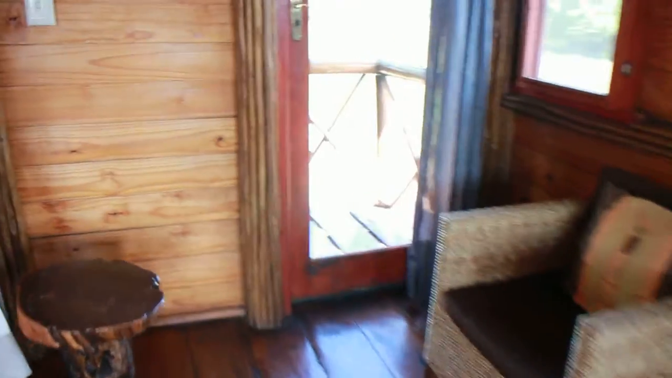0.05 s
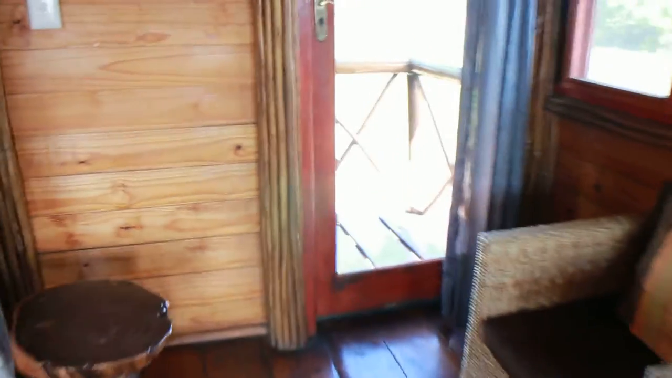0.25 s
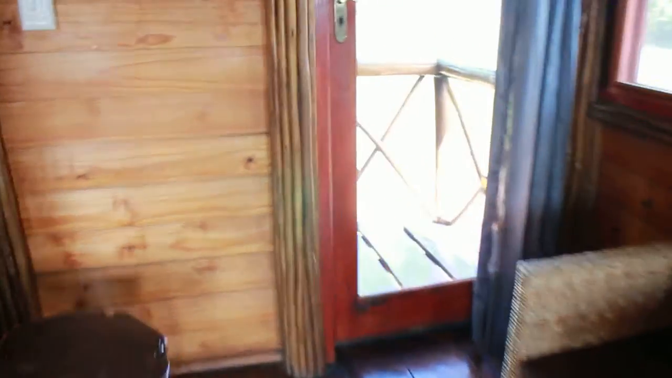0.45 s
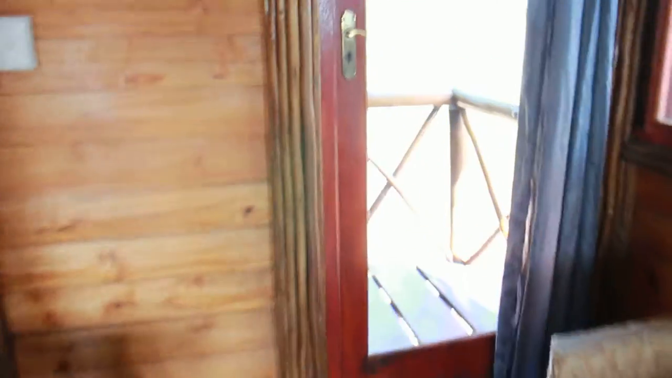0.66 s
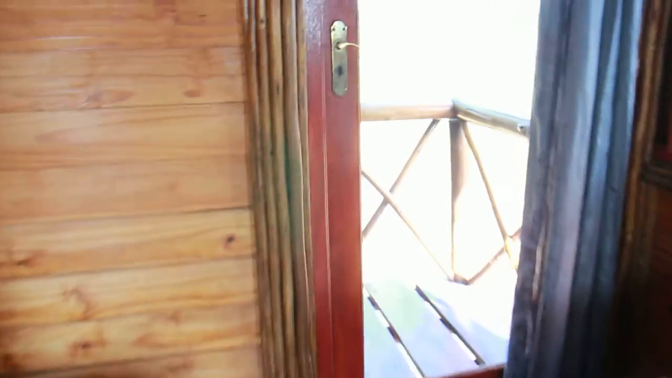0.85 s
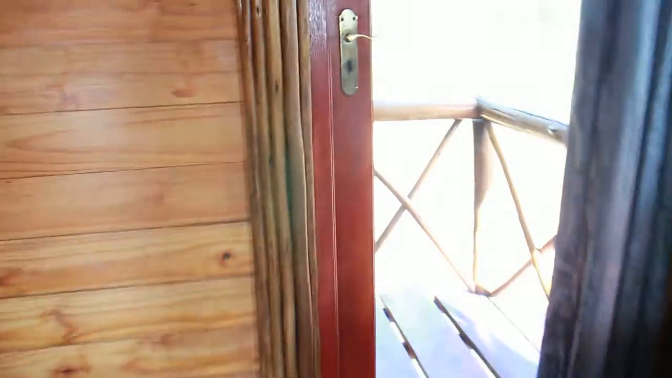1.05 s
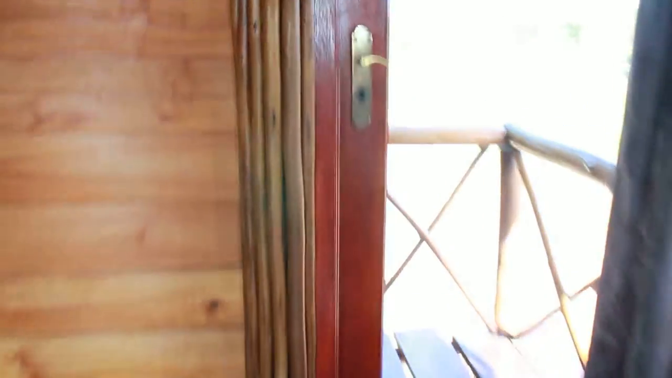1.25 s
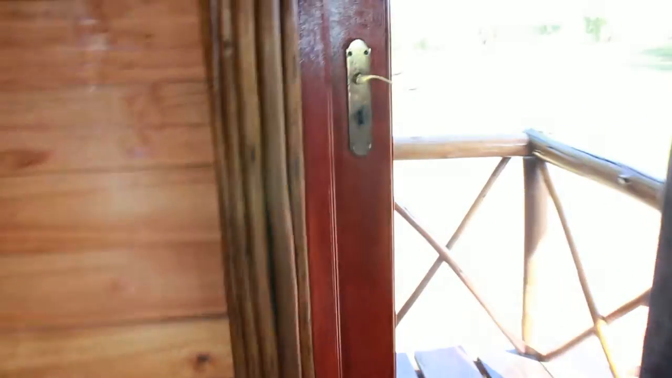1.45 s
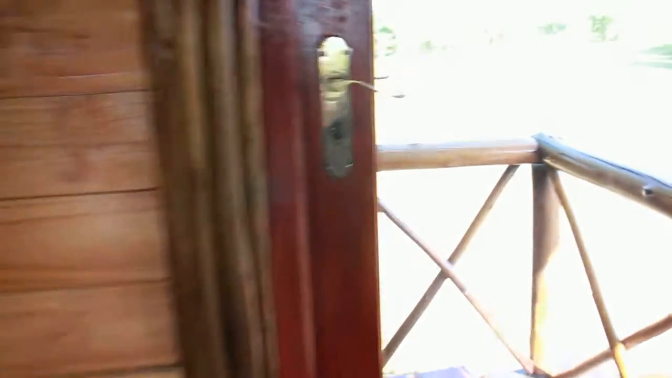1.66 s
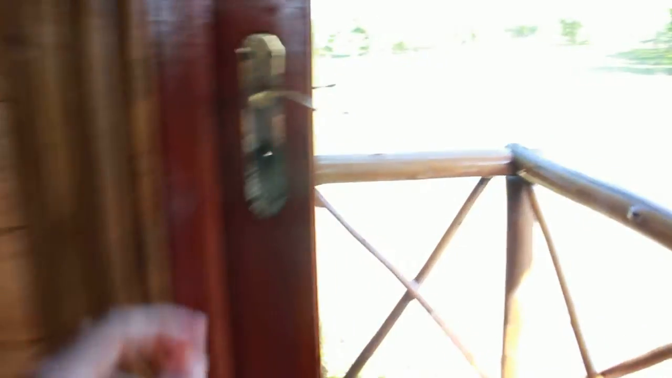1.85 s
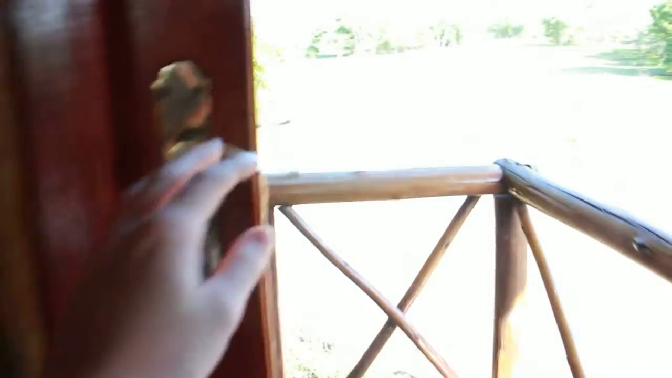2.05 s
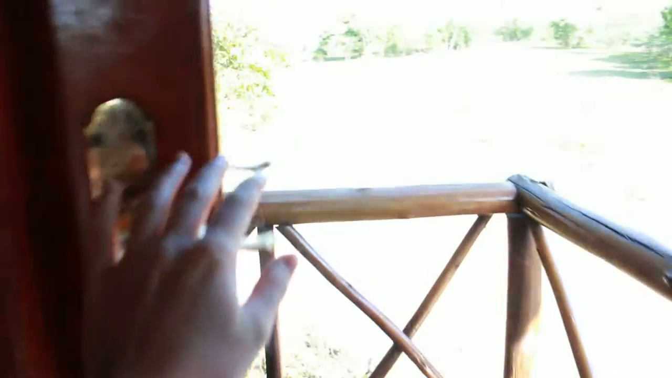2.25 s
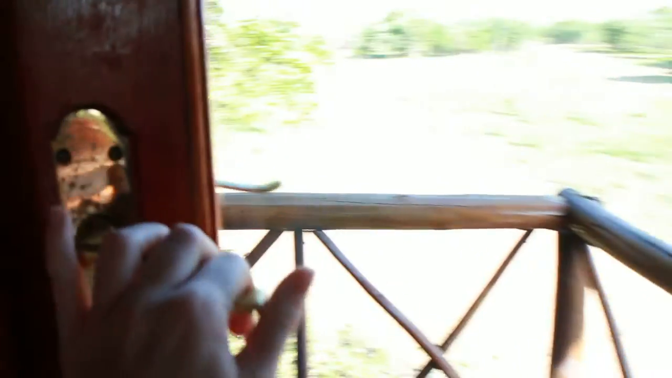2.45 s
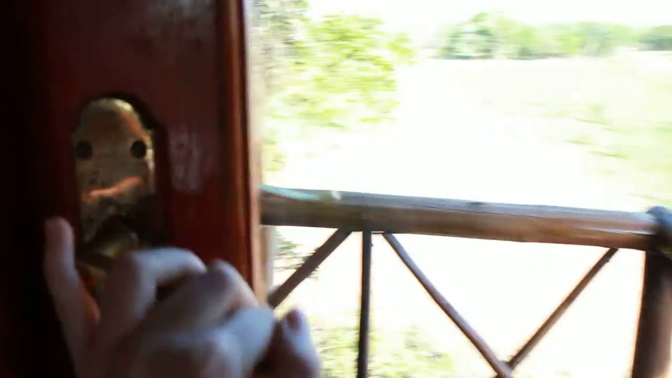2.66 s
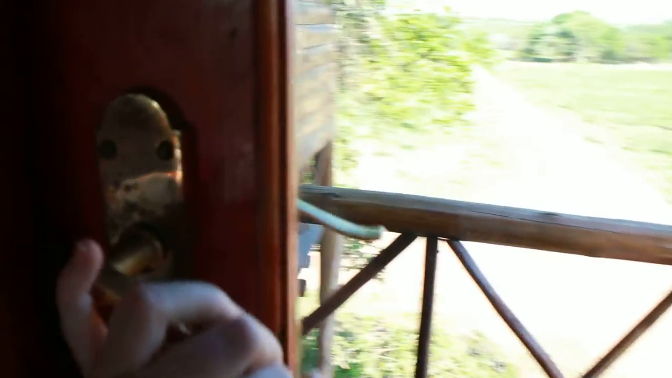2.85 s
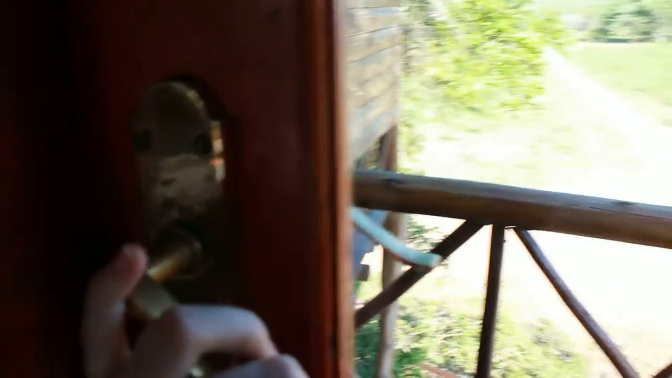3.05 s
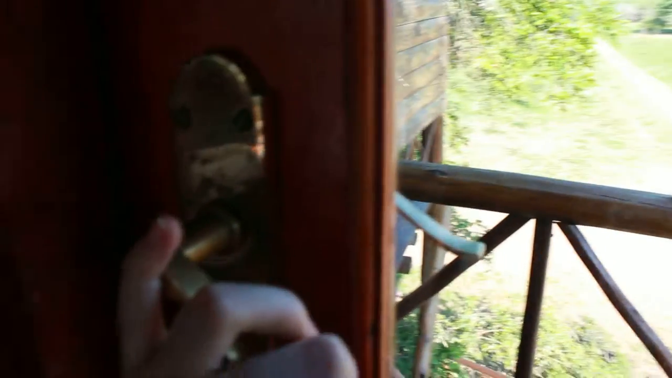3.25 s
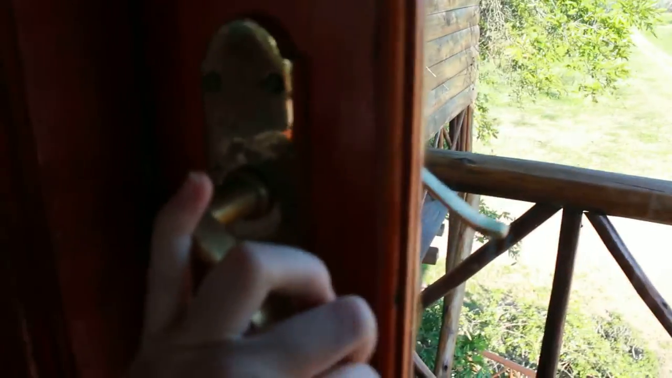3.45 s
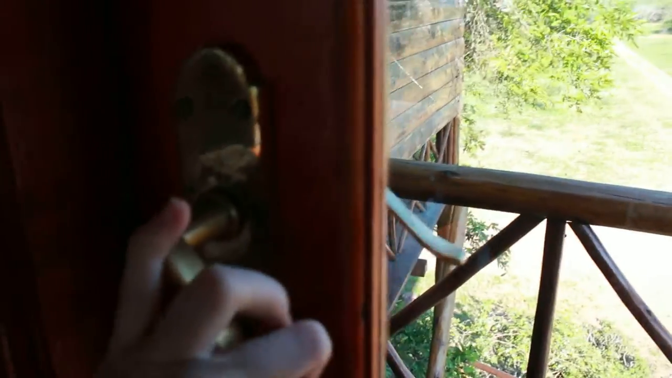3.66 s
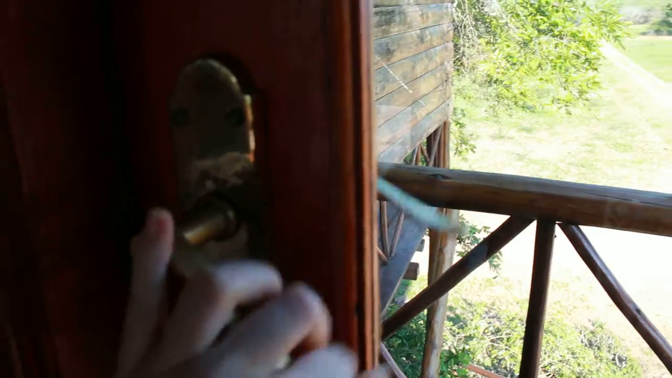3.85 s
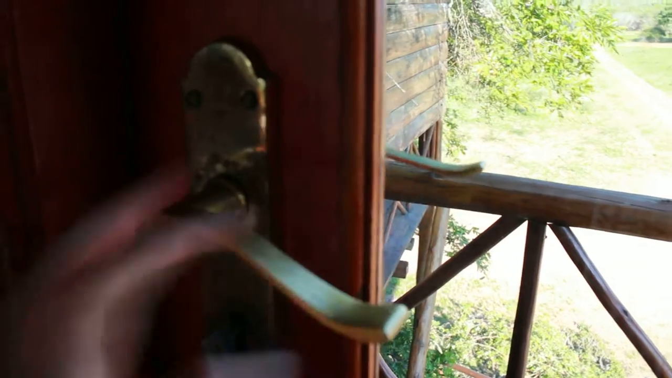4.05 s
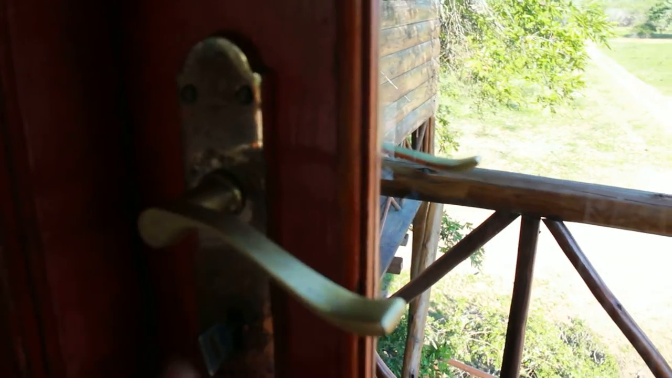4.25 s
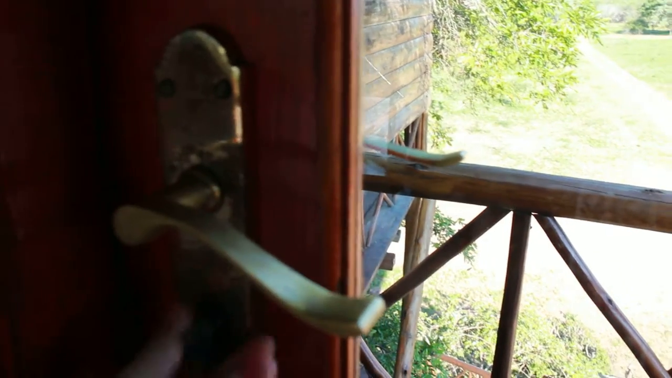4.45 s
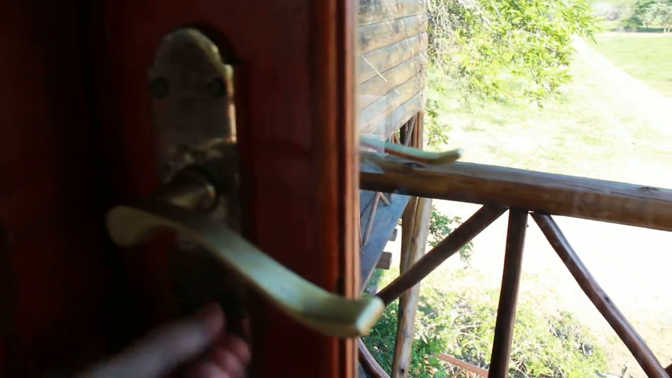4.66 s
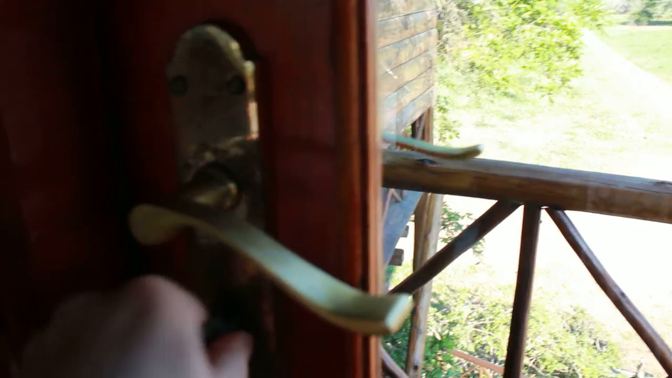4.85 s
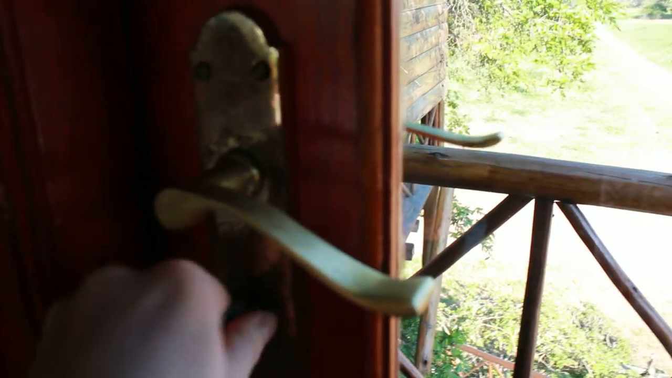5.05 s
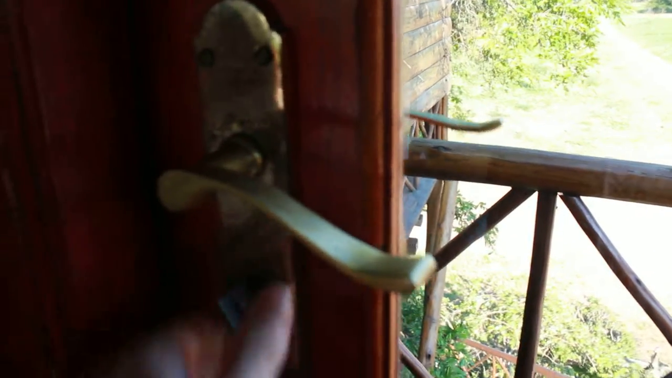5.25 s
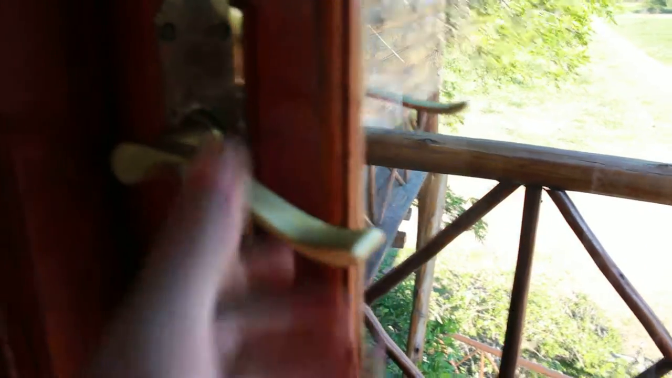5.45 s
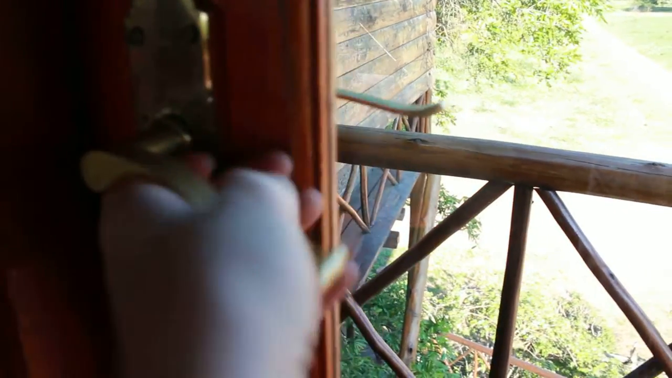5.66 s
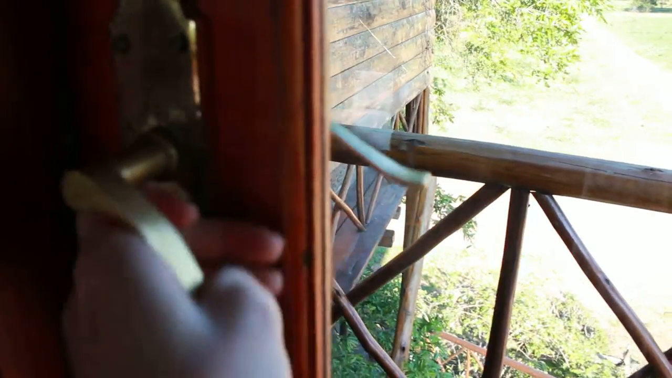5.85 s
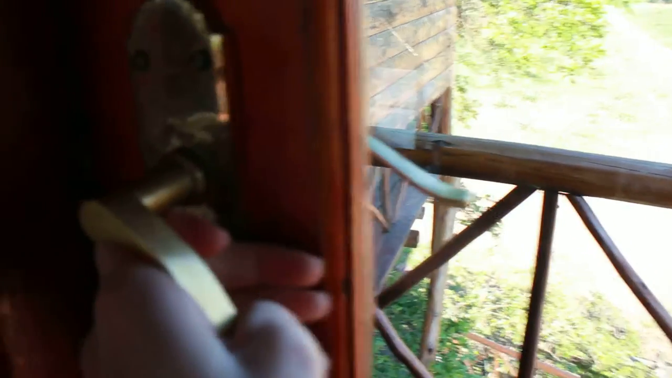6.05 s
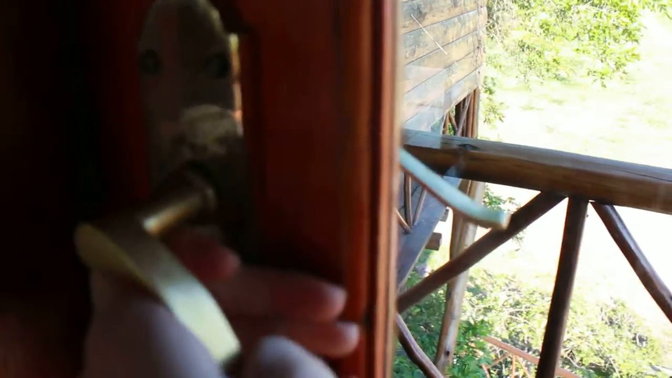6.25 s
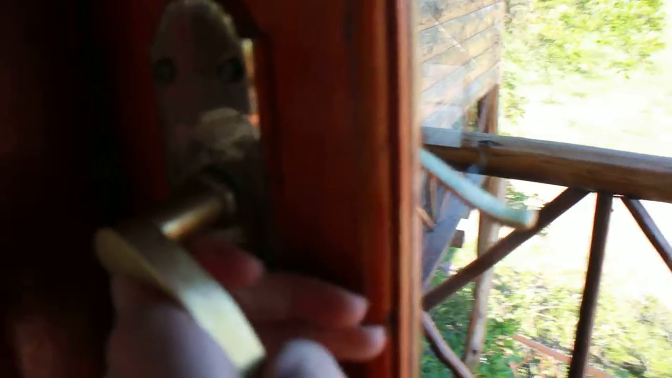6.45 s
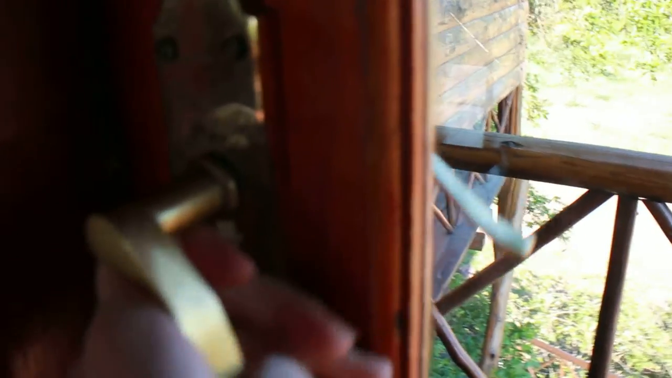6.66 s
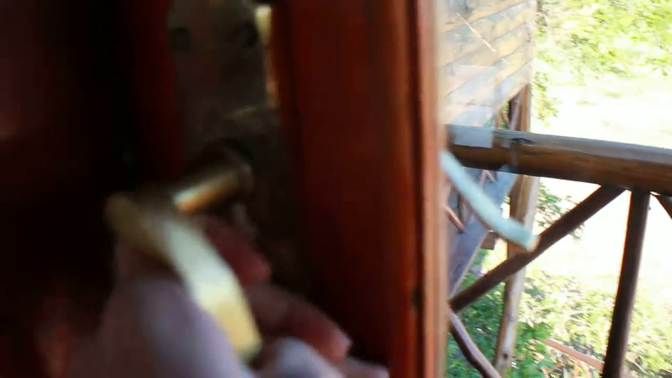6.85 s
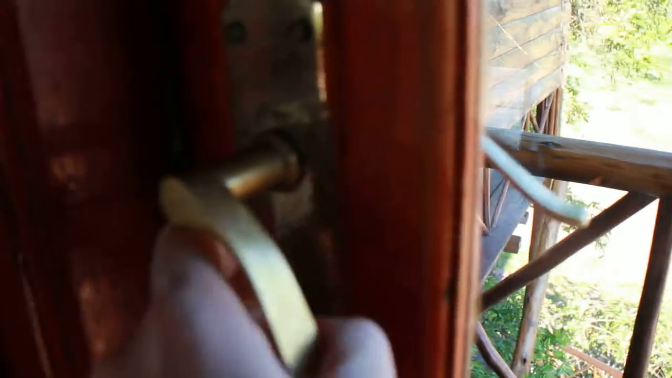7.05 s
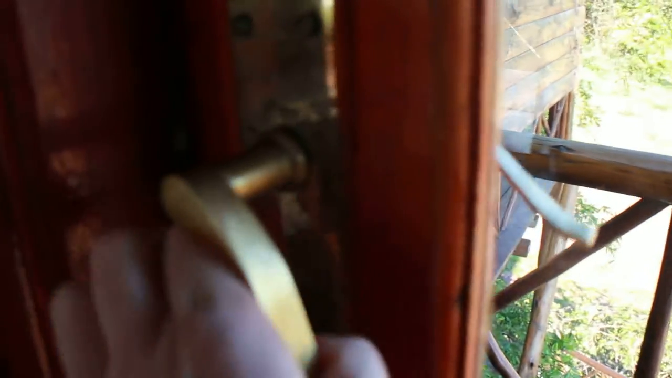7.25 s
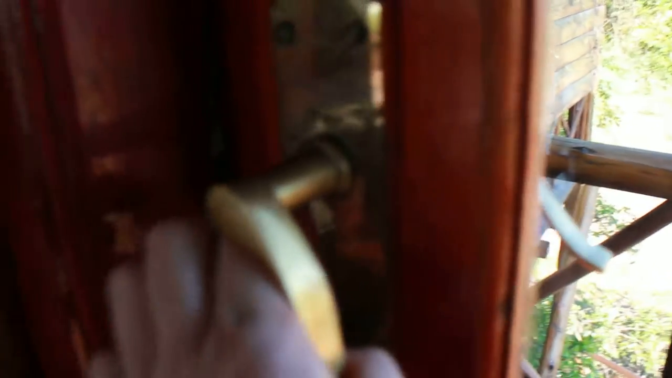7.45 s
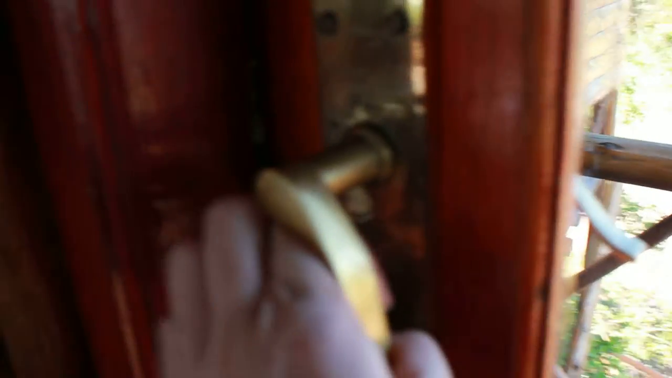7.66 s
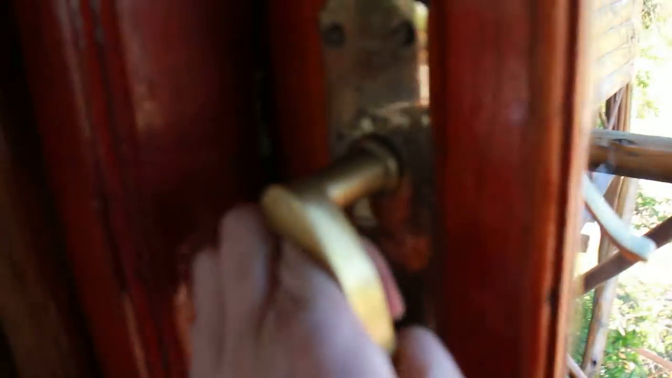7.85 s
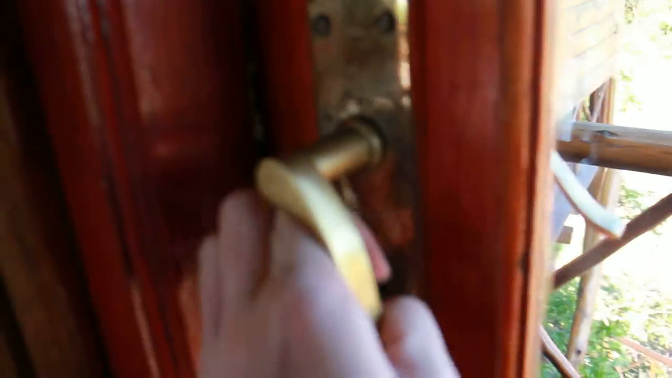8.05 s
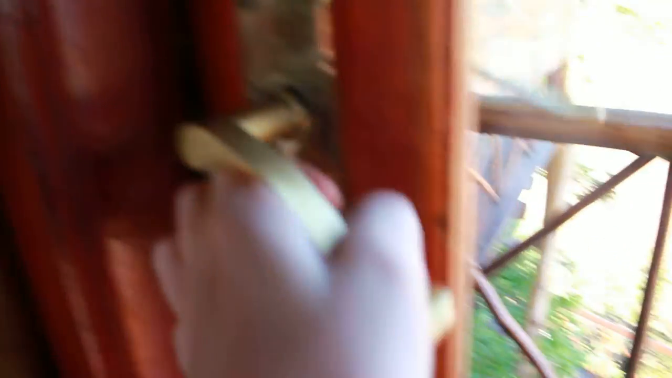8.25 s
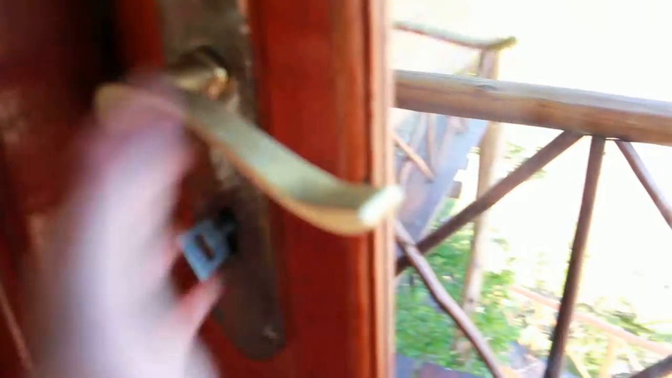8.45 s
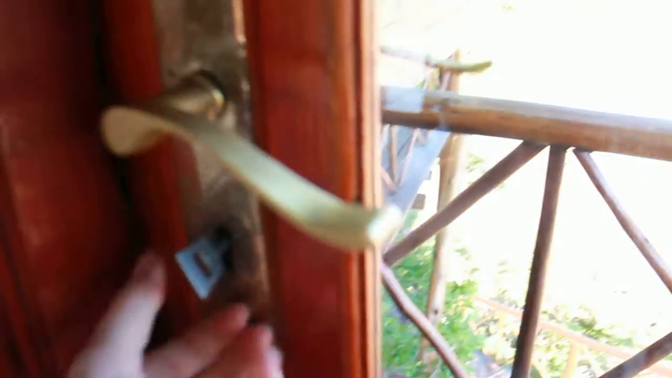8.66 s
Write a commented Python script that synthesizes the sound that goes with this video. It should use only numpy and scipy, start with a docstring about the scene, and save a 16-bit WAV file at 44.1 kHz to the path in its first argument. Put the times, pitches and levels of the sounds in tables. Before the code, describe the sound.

After soft footsteps on boards, a brass door lever and key clack, rattle and squeak inside a small quiet wooden room.

```python
"""Over quiet outdoor air and handling rumble, steps and scuffs sound on boards, then dry ticks near the microphone.
From 2.3 s a door's brass lever is worked: lever, latch and key are noise bursts ringing lock case and door modes.
Sliding parts scrape as modulated noise and rattle as random strikes; dull blows on wood continue between them.
From 3.5 s the dry spindle squeaks at times, as stick-slip tones with harmonics; a key turns between 4.4 and 5 s.
The small timber room adds a short, dull diffuse echo, and the recorder cuts the top."""
import sys
import numpy as np
from scipy import signal
from scipy.fft import rfft, irfft
from scipy.io import wavfile
from scipy.ndimage import map_coordinates

SR = 44100
rng = np.random.default_rng(int(sys.argv[2]) if len(sys.argv) > 2 else 0)


def int16_out(signal):
    """Quantize to a 16-bit WAV file."""
    q = np.round(np.clip(np.atleast_2d(signal).T, -1, 1) * 32767)
    wavfile.write(sys.argv[1], SR, q.astype(np.int16))


N = 384728
TOP_HZ = 16100  # upper limit of the recorder

# Radiating parts: door leaf, lock case, brass parts, contact edge. Columns: low f/Hz, high f/Hz
PART_BANDS = [(90, 726), (600, 2480), (2400, 5460), (6500, 9670)]
# Metal sliding in the lock. Columns: start t/s, nominal length t/s, nominal level/dB, brightness/dB per band
SLIDES = [(2.313, 0.016, -52, 0), (2.656, 0.096, -48.5, -7.5), (3.005, 0.052, -44, -0.5),
          (3.131, 0.03, -49.5, -1.5), (3.814, .06, -43.5, 4), (3.927, 0.014, -33.5, -1),
          (4.514, .2, -42, 1), (4.721, 0.088, -47, -9.5), (5.586, .12, -45, 3), (5.701, 0.059, -35, -3),
          (5.865, .008, -46, 1.5), (6.14, 0.013, -40.5, -3), (6.575, 0.063, -40.5, 7.5),
          (6.661, 0.08, -48, -1.5), (6.915, .055, -45, -0.5), (6.986, 0.04, -37.5, -0.5),
          (7.26, 0.075, -43, 4), (8.189, 0.062, -31.5, 4), (8.36, 0.0345, -42.5, -2.5)]
# Nominal activity of the hand holding the microphone. Columns: t/s, level/dB
HAND_MOTION = [(0, -60), (.9, -62), (1.9, -54.5), (3.5, -46.5), (4.3, -82), (6.4, -50), (8.7, -60)]


def undb(db):
    """Amplitude ratio from a level difference in decibels."""
    return 10 ** (np.asarray(db) / 20)


def unit(x):
    """Normalisation by mean power: scale to rms 1."""
    return x / np.sqrt(np.mean(x ** 2) + 1e-20)


def band(x, lo_hz, hi_hz, order=3):
    """Causal band-pass with a maximally flat passband."""
    edges_hz = [lo_hz, min(hi_hz, SR / 2 - 100)]
    return signal.sosfilt(signal.butter(order, edges_hz, "bandpass", fs=SR, output="sos"), x)


def wander(count, hz):
    """Band-limited random motion: a cubic spline through Gaussian knots of spread 1, hz knots a second."""
    knots = np.arange(count) / SR * hz
    return map_coordinates(rng.standard_normal(int(knots[-1]) + 4), [knots + 1], order=3)


def stereo_noise(count, side_db):
    """Mid-side superposition: the level of the antiphase part sets how far the two channels differ."""
    mid, side = rng.standard_normal((2, count))
    return mid + undb(side_db) * side * np.array([[1], [-1]])


def fade(t, t60):
    """Exponential decay: the amplitude falls by 60 dB in t60 seconds."""
    return np.exp(-np.log(1000) * t / t60)


def add(out, start, sound):
    """Linear superposition of a sound at its start time in seconds."""
    i = max(int(start * SR), 0)
    out[:, i:i + sound.shape[-1]] += sound[..., :N - i]


def resonance(x, hz, width_hz):
    """Forced response of one damped mode, with gain 1 at its centre."""
    return signal.lfilter(*signal.iirpeak(hz, hz / width_hz, fs=SR), x)


def body(x):
    """Modal superposition: whatever shakes the lock also rings the door's own modes."""
    # Door with its lock case. Columns: f/Hz, width f/Hz, level/dB relative to the broad response
    door_modes = [(245.8, 3.3, -5), (698, 15, -59.5), (847, 250, -7.5), (1252, 180, -6.5), (1483, 80, -3.5),
                  (2270, 12, -5), (4022, 40, 2), (4940, 70, 1.5), (5573, 76, -15)]
    return x + sum(undb(db) * resonance(x, hz, width_hz) for hz, width_hz, db in door_modes)


def blow(t60, crack_db, chatter_db, length_s=.3):
    """Impulsive excitation: a crack, then a dense decaying ring broken by tiny rebounds."""
    t = np.arange(int(length_s * SR)) / SR
    onset = 1 - np.exp(-t / 0.00041)
    envelope = (fade(t, t60) + undb(crack_db) * fade(t, 0.00087)) * onset
    shake = stereo_noise(len(t), side_db=-17)
    chatter = undb(chatter_db * wander(len(t), 420))
    return body(shake * envelope * chatter)


def strength(x, db):
    """Onset level: scale a blow by the spread of its first 14 ms."""
    return x * undb(db) / np.std(x[:, :int(.014 * SR)])


def background():
    """Stationary coloured noise, wide in the treble, plus low-frequency rumble of the moving hand."""
    # Relative spectral density of outdoor air and hiss. Columns: f/Hz, level/dB per Hz
    air_spectrum = [(15, -36.5), (25, 6.5), (108, 0.5), (344, -2), (1440, -12), (2050, -15.5), (4140, -15),
                    (6560, -26), (9570, -17.5), (11300, -26.5), (14800, -23), (16000, -33)]
    air_db = -53
    f = np.maximum(np.fft.rfftfreq(N, 1 / SR), 1)
    hz, db = np.transpose(air_spectrum)
    colour = undb(np.interp(np.log(f), np.log(hz), db))
    width = undb(np.interp(np.log(f), np.log([200, 2000, 12000]), [-11, -6, 1]))
    mid, side = rfft(rng.standard_normal((2, N)))
    air = unit(irfft(colour * (mid + width * side * np.array([[1], [-1]])), N))

    rumble = band(stereo_noise(N, side_db=-13), 28, 150, order=1)
    rumble = unit(band(rumble, 18, 400, order=2))
    time = np.arange(N) / SR
    motion_db = np.interp(time, *np.transpose(HAND_MOTION)) - 1.5 + 1.27 * wander(N, 9.9)
    return undb(air_db) * air + undb(motion_db) * rumble


def room(x):
    """Diffuse reverberation: convolution with decaying noise; absorption leaves the bass longest."""
    # Decay of the room by band. Columns: low f/Hz, high f/Hz, t60 t/s, level/dB
    decay_bands = [(65.3, 376, 0.76, -15), (415, 1310, 0.27, -12), (1720, 2900, 0.19, -14),
                   (5030, 42000, 0.22, -16)]
    t = np.arange(int(.6 * SR)) / SR
    build_up = 1 - np.exp(-(t / 0.014) ** 2)
    response = 0
    for lo, hi, t60, db in decay_bands:
        tail = stereo_noise(len(t), side_db=-2) * build_up * fade(t, t60)
        tail = unit(tail) / np.sqrt(len(t))
        response = response + undb(db) * band(tail, lo, hi)
    return signal.fftconvolve(x, response, axes=1)[:, :N]


def fidget():
    """Random impacts: faint bumps and taps, stronger while the hand is busy."""
    out = np.zeros((2, N))
    for moment, size, pitch in rng.random((55, 3)):
        start = moment * N / SR
        db = np.interp(start, *np.transpose(HAND_MOTION)) + 1 + 8 * size
        centre_hz = 170 * 7 ** pitch
        tap = blow(.1, crack_db=5, chatter_db=3.5, length_s=.15)
        tap = band(tap, centre_hz / 2, centre_hz * 2, order=2)
        add(out, start, strength(tap, db - 4 * pitch))
    return out


def scuffs():
    """Friction noise: a sole brushes the boards in a smooth swell with one hollow resonance."""
    # Shoes on the boards. Columns: start t/s, length t/s, level/dB before the swell
    sole_strokes = [(0.462, 0.17, -41.5), (0.95, 0.11, -50.5), (1.76, .45, -54.5)]
    hollow_hz, hollow_db = 800, 7
    out = np.zeros((2, N))
    for start, length, db in sole_strokes:
        count = int(length * SR)
        friction = band(stereo_noise(count, side_db=-4.5), 550, 1400, order=1)
        friction = band(friction, 150, 8800, order=2)
        friction = friction + undb(hollow_db) * resonance(friction, hollow_hz, width_hz=30)
        swell = np.sin(np.linspace(0, np.pi, count))
        add(out, start, undb(db) * unit(friction) * swell)
    return out


def wood():
    """Struck plates: a short knock, the decaying boom of a floor board or door leaf, and floor rumble."""
    # Blows of feet and hand. Columns: t/s, nominal boom level/dB, hardness (knock over boom) level/dB, boom f/Hz
    board_blows = [(0.405, -44.5, -9, 107), (1.115, -33, 2, 194), (1.156, -37.5, 1, 168),
                   (1.539, -36, 11.5, 110.5), (1.716, -36.5, -19, 99), (2.405, -43, 11, 270),
                   (2.445, -35.5, 1, 88), (2.7, -34.5, 1, 265), (3.193, -36.5, -13.5, 284),
                   (3.458, -36.5, 11.5, 86.4), (4.277, -32.5, 7.5, 355), (5.079, -35.5, -7, 298),
                   (5.735, -29.5, 0, 349), (5.261, -41, -8.5, 324), (6.383, -26.5, 7.5, 399),
                   (7.785, -36, 9.5, 300)]
    t60_at_200_hz, t60_exponent = 0.18, -0.51  # seconds; lower boards ring longer
    floor_t60_s, floor_db = 0.63, -15  # the timber floor rumbles on after a blow
    out = np.zeros((2, N))
    t = np.arange(int(.5 * SR)) / SR
    for start, boom_db, hardness_db, boom_hz in board_blows:
        t60 = t60_at_200_hz * (boom_hz / 200) ** t60_exponent
        board = band(blow(t60, crack_db=0, chatter_db=3.5), 108, 404, order=2)
        boom = np.sqrt(2) * np.sin(2 * np.pi * boom_hz * t)
        boom = boom * fade(t, t60 * 0.85) * (1 - np.exp(-t / 0.00104))
        knock = band(blow(t60 * 0.55, crack_db=-7, chatter_db=3.5), 400, 1800, order=2)
        rumble = unit(band(stereo_noise(len(t), side_db=5), 130, 340, order=2))
        rumble = rumble * fade(t, floor_t60_s) * (1 - np.exp(-t / 0.0177))
        add(out, start, strength(board, boom_db - 3.0) + strength(knock, boom_db + hardness_db - 17.5))
        add(out, start, undb(boom_db) * (undb(-2.0) * boom + undb(floor_db) * rumble))
    return out


def ticks():
    """Transient noise without modal ringing: tiny dry handling snaps at the microphone."""
    # Handling snaps. Columns: t/s, nominal level/dB
    dry_snaps = [(0.814, -37.5), (0.871, -28), (0.919, -25), (1.034, -34.5)]
    out = np.zeros((2, N))
    t = np.arange(int(0.017 * SR)) / SR
    for start, db in dry_snaps:
        grit = stereo_noise(len(t), side_db=-10)
        snap = grit * (fade(t, 0.0057) + undb(-1) * fade(t, 0.0153))
        snap = band(snap, 20, 10000, order=2)
        add(out, start, undb(db - 11.5) * unit(band(snap, 97, 5000, order=1)))
    return out


def squeaks():
    """Stick-slip oscillation locked to a brass resonance; a loose grip makes it stutter and rasp."""
    # Spindle squeaks, one short curve each. Columns: t/s, pitch f/Hz, nominal level/dB, roughness [ratio]
    spindle_curves = [
        [(3.515, 4750, -59, 0.48), (3.54, 4640, -55, 0.59), (3.61, 4520, -72, .4)],
        [(3.808, 2650, -39, 0.54), (3.824, 2680, -40, 0.77), (3.836, 2910, -23, 0), (3.846, 2580, -36, 0.66),
         (3.871, 2586, -30.5, 0.27), (3.895, 2530, -68, .4)],
        [(4.003, 12300, -51, .1), (4.009, 12140, -35.5, 0.19), (4.015, 12200, -58, .1)],
        [(6.595, 4400, -59, 0.6), (6.626, 4300, -33.5, 0.44), (6.68, 4430, -50.5, 1.02),
         (6.735, 4370, -53, 0.89)],
        [(6.979, 2830, -42, 0.2), (6.987, 2940, -13, 0.13), (6.996, 2920, -12, 0.03), (7.017, 2930, -41.5, 0),
         (7.024, 2885, -20.5, 0.21), (7.058, 2796, -47, 0.16)],
        [(8.186, 2724, -29, 0), (8.199, 2800, -18.5, 0.78), (8.208, 2890, -12, 0.1), (8.216, 2890, -21, 0.32),
         (8.231, 2815, -20, 0.54), (8.24, 2980, -14.5, 0), (8.258, 2970, -45, 0)],
    ]
    out = np.zeros((2, N))
    for rows in spindle_curves:
        s, *columns = np.transpose(rows)
        t = np.arange(s[0], s[-1], 1 / SR)
        hz, db, rough = (np.interp(t, s, c) for c in columns)
        jittered_hz = hz * (1 + .09 * rough * wander(len(t), 1400))
        phase = 2 * np.pi * np.cumsum(jittered_hz) / SR
        stutter = undb(db + 5.8 * rough * wander(len(t), 352))
        tone = np.sin(phase)
        for k, harmonic_db in enumerate([-21, -32, -48], 2):
            # harsh slips drive the lever's second resonance, near 5.5 kHz
            rasp_db = 24 * rough * np.exp(-((k * hz - 5500) / 1200) ** 2)
            gain = undb(harmonic_db + rasp_db + 2 * wander(len(t), 114))
            tone = tone + gain * np.sin(k * phase) * (k * hz < TOP_HZ)
        add(out, s[0], np.sqrt(2) * stutter * tone)
    return out


def rubs():
    """Sliding friction: a hail of tiny slips, a few of them sharp, swells and fades with the pressure."""
    # Bands in a slide of ordinary brightness: leaf, case, brass, edge. Column: relative level/dB
    slide_balance = [.5, -2, -10, -17.5]
    out = np.zeros((2, N))
    edge_s = .012  # contact begins this early and ends twice this late
    for start, length, db, brightness_db in SLIDES:
        t = np.arange(-edge_s, length + 2 * edge_s, 1 / SR)
        contact = np.sin(np.linspace(0, np.pi, len(t))).clip(0) ** 0.47
        slips = undb(3 * wander(len(t), 600) + 2.3 * wander(len(t), 70))
        grit = body(stereo_noise(len(t), side_db=-9) * slips)
        for (lo, hi), band_db, tilt in zip(PART_BANDS, slide_balance, [-1, 0, 1, 1]):
            gain = undb(db + band_db + tilt * brightness_db)
            add(out, start - edge_s, contact * gain * unit(band(grit, lo, hi, order=2)))
    return out


def strike(db, hardness_db, case_hz, key_db=0):
    """Impact spectrum: a hard contact excites brass and edge, a low-pitched one shakes the door leaf."""
    length_s, case_t60_s = .15, 0.055
    octaves = np.log2(case_hz / 1000)
    firmness_db = db + 36.5
    # the heavy leaf gains less than the case as blows grow firmer
    leaf_db = db - 3 - 3 * octaves - 0.22 * firmness_db
    edge_db = db - 8.5 + 0.85 * hardness_db + key_db
    leaf = blow(case_t60_s * 2.06, crack_db=7, chatter_db=5.5, length_s=length_s)
    leaf = band(leaf, *PART_BANDS[0])
    case = blow(case_t60_s, crack_db=-13, chatter_db=1, length_s=length_s)
    case = band(case, *PART_BANDS[1])
    case = case + undb(5.5) * resonance(case, case_hz, width_hz=120)
    metal = blow(case_t60_s * .52, crack_db=9, chatter_db=4.5, length_s=length_s)
    edge = band(metal, *PART_BANDS[3]) + undb(-16 + key_db / 2) * band(metal, 11800, 15100)
    brass = band(metal, *PART_BANDS[2])
    low_parts = strength(leaf, leaf_db) + strength(case, db)
    return low_parts + strength(brass, db + hardness_db) + strength(edge, edge_db)


def rattle():
    """Random impacts under friction: loose parts tick wherever metal slides, at levels that follow the slide."""
    ticks_per_s, offset_db, spread_db, hardness_db = 20, -1, 7, -3
    out = np.zeros((2, N))
    for start, length, db, brightness_db in SLIDES:
        for moment, size, pitch in rng.random((round(length * ticks_per_s), 3)):
            tick_db = db + offset_db + spread_db * (2 * size - 1)
            tick = strike(tick_db, hardness_db + brightness_db, 1200 * 2 ** pitch)
            add(out, start + moment * length, tick)
    return out


def lock():
    """Impact and restitution: lever, latch and key strike, then rebound weakly; sliding parts graze first."""
    # Metal strikes. Columns: t/s, case level/dB, hardness (brass over case) level/dB, contact resonance f/Hz
    metal_strikes = [(2.337, -29, -26, 1290), (2.479, -36, 0, 1950), (2.636, -35.5, -19.5, 1210),
                     (2.684, -37, -10, 860), (2.706, -41, 0.5, 1080), (2.87, -41, -1, 865),
                     (3.027, -39.5, 0, 2030), (3.048, -33, 0, 1450), (3.464, -40, -9, 1295),
                     (3.937, -30, -6.5, 760), (3.981, -24.5, -13, 1360), (4.019, -29.5, -10.5, 2010),
                     (4.498, -34.5, -3, 654), (4.702, -43, -3, 1100), (4.772, -31.5, -1.5, 1820),
                     (4.832, -40.5, -9, 1540), (4.849, -30.5, -1.5, 1440), (5.078, -38.5, -0.5, 620),
                     (5.26, -42.5, -6.5, 1430), (5.559, -34.5, -3, 800), (5.734, -29.5, -24.5, 830),
                     (5.792, -28, -3.5, 597), (5.829, -34.5, -1.5, 2226), (5.878, -24.5, -6, 1700),
                     (6.134, -39, -11, 640), (6.188, -17, -7.5, 1400), (6.634, -30, 1, 1450),
                     (6.732, -39, -10.5, 1652), (6.811, -47, 5, 984.2), (6.907, -31.5, -8.5, 900),
                     (6.972, -37, 7.5, 1270), (7.259, -40.5, 3, 1497), (7.296, -27, 1, 2300),
                     (7.355, -25.5, -13.5, 1570), (8.151, -37.5, -2.5, 631), (8.179, -32, -8, 1259),
                     (8.198, -34, 13, 2400), (8.269, -29, -24, 1260), (8.286, -24.5, -2, 1170),
                     (8.333, -29.5, -19, 930), (8.4, -30.5, -1.5, 644), (8.632, -43, -12.5, 830)]
    # While the thin key is turned, its edges click more brightly. Columns: start t/s, end t/s
    key_turn = (4.4, 5.0)
    key_edge_db = 5
    mean_rebound_s, rebound_db = 0.01, -16.5
    mean_graze_s, graze_db = .005, -7.5
    slide_reach_s = .04  # strikes this soon after a slide still graze
    out = np.zeros((2, N))
    timing = .5 + rng.random((len(metal_strikes), 2))
    for (start, db, hardness_db, case_hz), (early, late) in zip(metal_strikes, timing):
        key_db = key_edge_db * (key_turn[0] < start < key_turn[1])
        hit = strike(db, hardness_db, case_hz, key_db)
        if any(0 < start - slide_s < length + slide_reach_s for slide_s, length, _, _ in SLIDES):
            excess_db = max(db + 36.5, 0)  # firm blows graze no louder
            add(out, start - mean_graze_s * early, undb(graze_db - excess_db) * hit)
        add(out, start, hit)
        add(out, start + mean_rebound_s * late, undb(rebound_db) * hit)
    return out


def scene():
    """Superposition of direct sound, echo and background; a level difference sets the door slightly right."""
    door = lock() + wood() + scuffs() + rubs() + squeaks() + fidget() + rattle()
    left_over_right_db = -2.7
    pan = undb(np.array([[left_over_right_db], [-left_over_right_db]]) / 2)
    return (door + room(door) + ticks()) * pan + background()


def record(dry):
    """Band limitation: the recorder cuts the top with a steep low-pass."""
    return signal.sosfilt(signal.ellip(8, .2, 70, TOP_HZ, fs=SR, output="sos"), dry)


dry = scene()
out = record(dry)
int16_out(out)
```